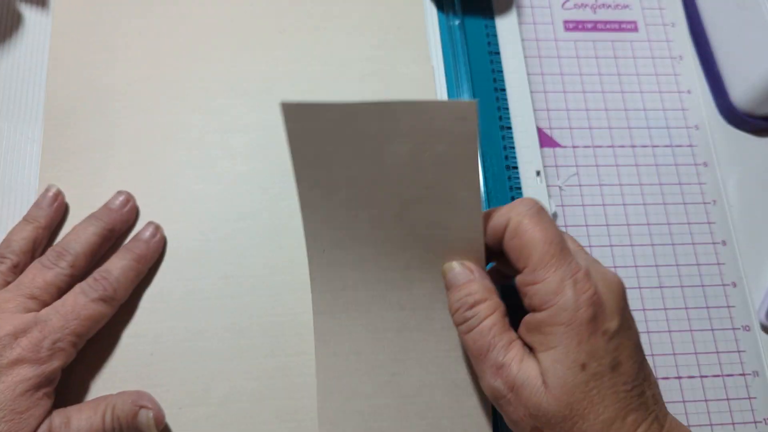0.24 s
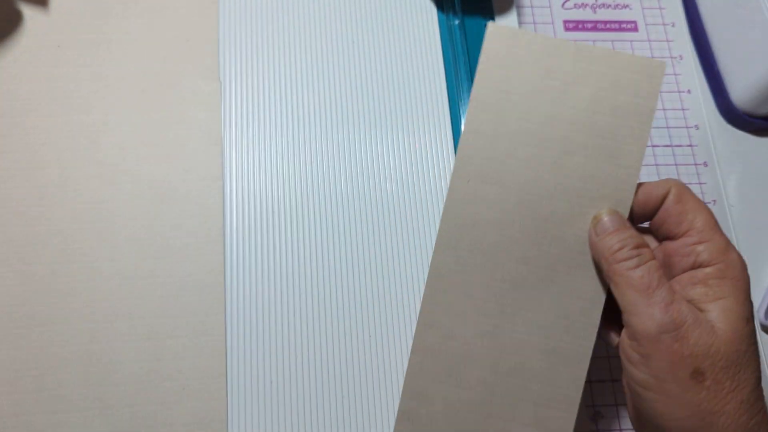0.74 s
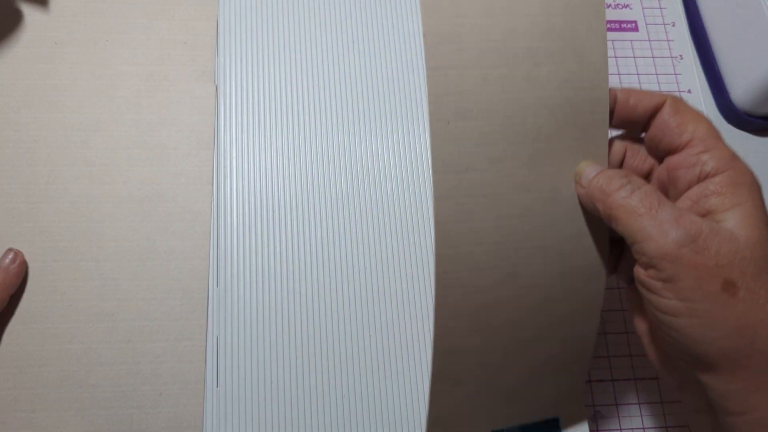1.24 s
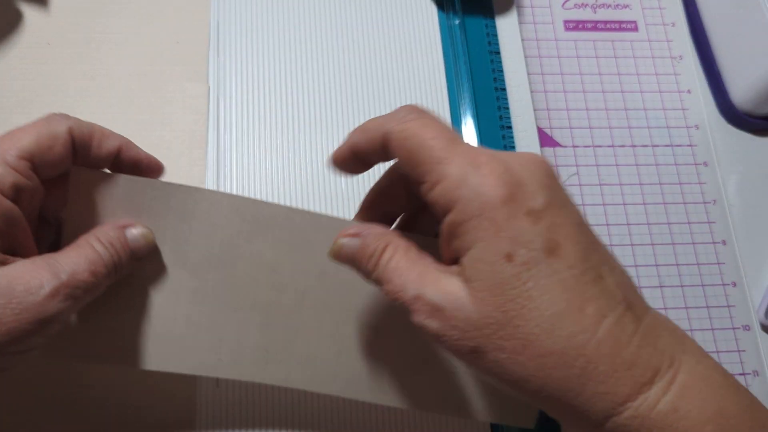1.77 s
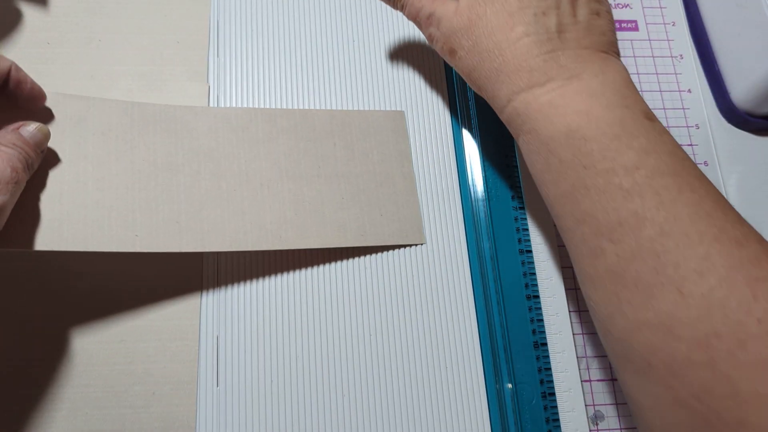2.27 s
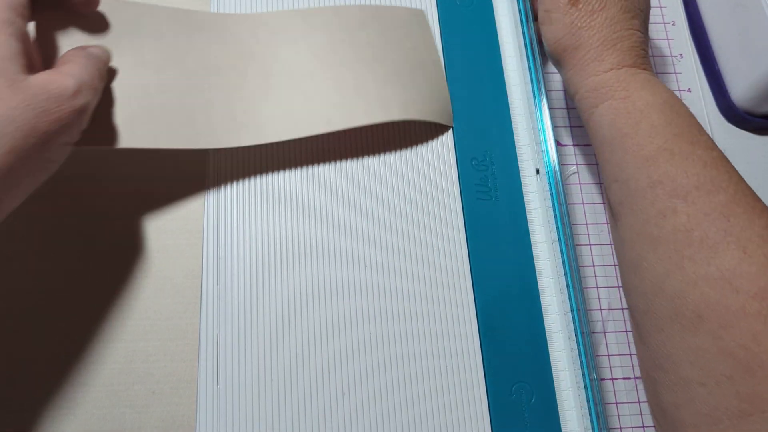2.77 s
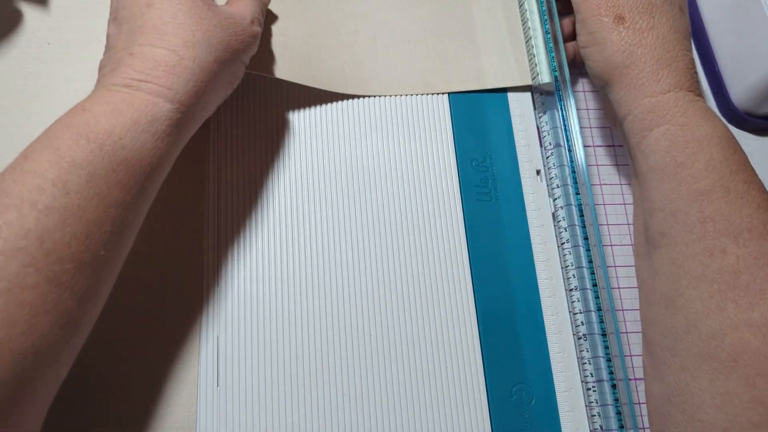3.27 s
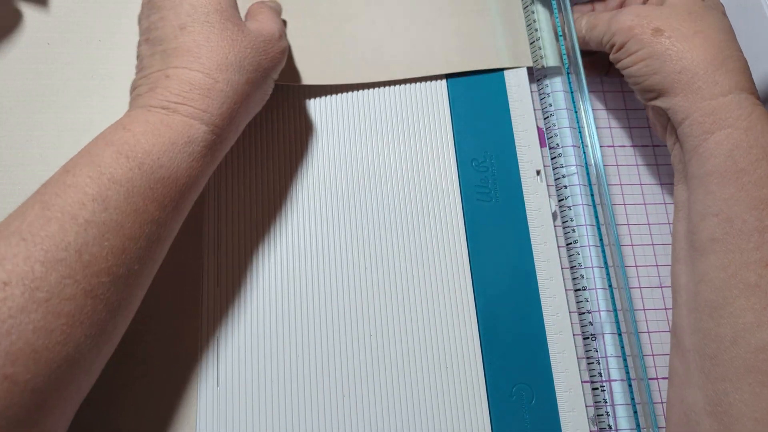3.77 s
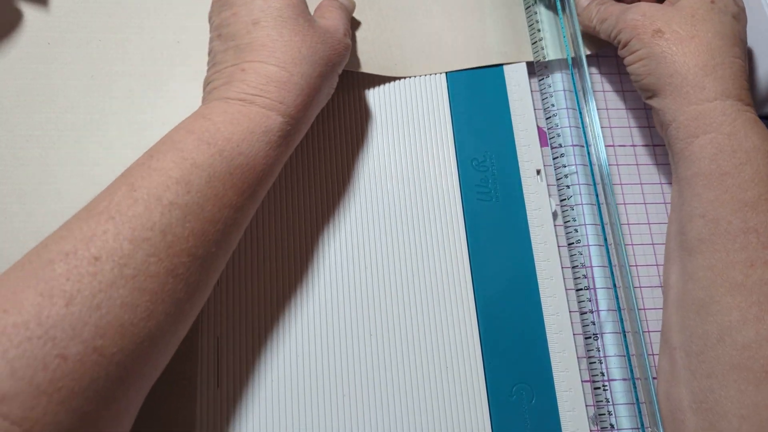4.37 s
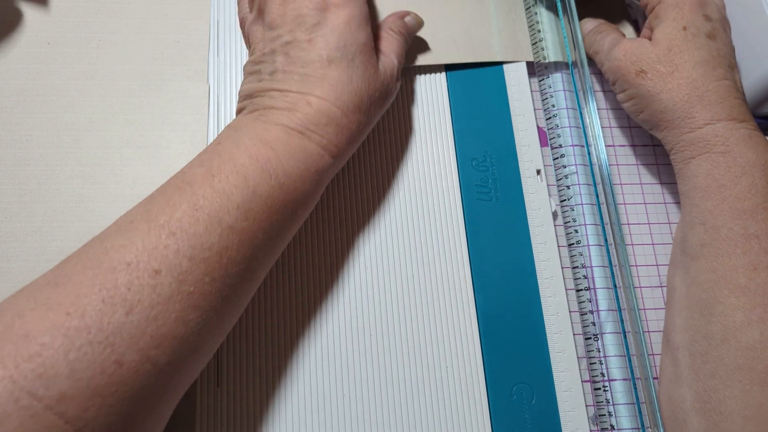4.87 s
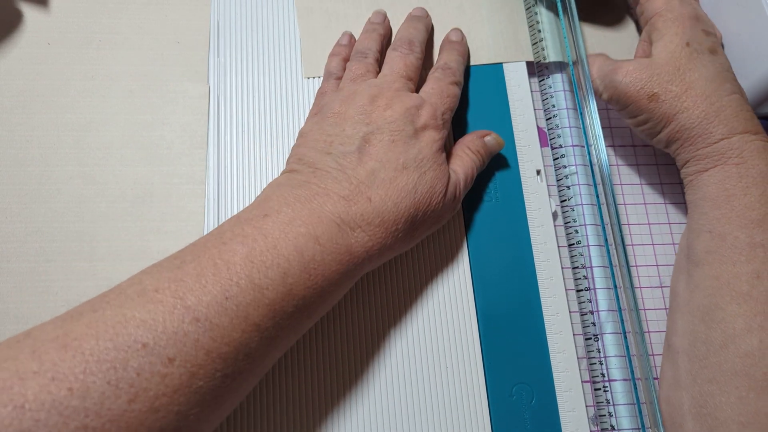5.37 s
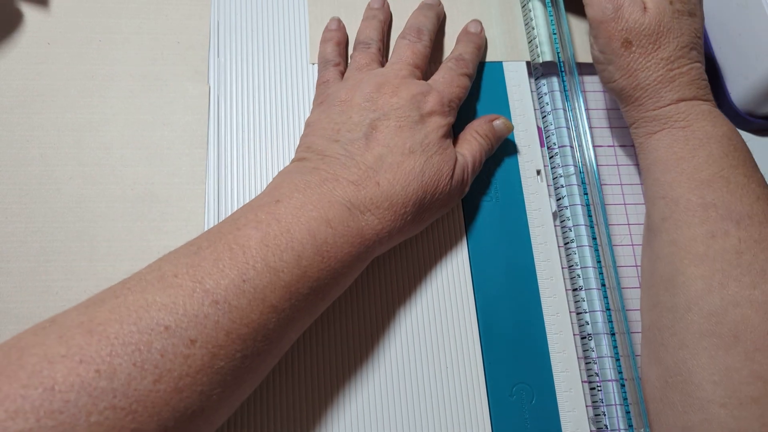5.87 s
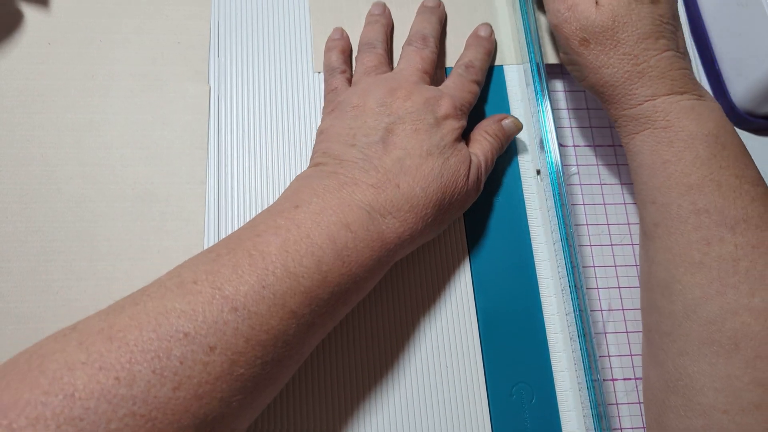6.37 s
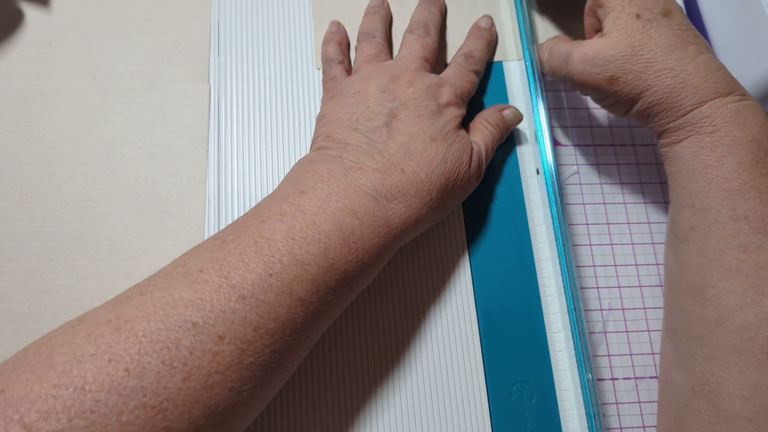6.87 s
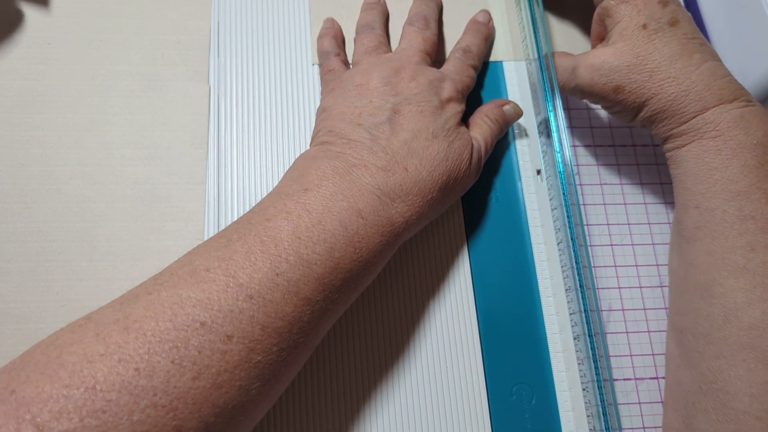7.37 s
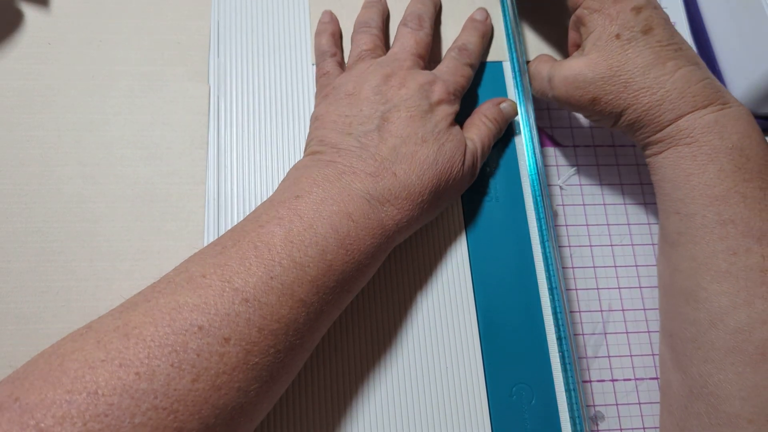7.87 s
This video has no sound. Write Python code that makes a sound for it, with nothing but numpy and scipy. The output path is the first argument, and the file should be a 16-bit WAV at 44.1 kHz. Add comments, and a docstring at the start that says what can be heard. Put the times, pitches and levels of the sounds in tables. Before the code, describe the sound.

Close in a quiet room, papery swish and flicks give way to a loud plastic clatter, hollow knocks, scraping card and faint final taps.

```python
"""Card strip on a paper trimmer

A craft table in a small quiet room, close by, heard by two microphones. A strip of card is slid over a plastic
trimmer: random fibre slips make its hiss and rustle, short ringing modes its flaps. The clear guide arm clacks
up in ringing modes with a crack, then the card scrapes and sings under it. Modes of the hollow base ring in its
knocks on the table; low noise bursts are hands landing there. Room air, a faint mains hum and microphone hiss
lie underneath."""
import sys
import numpy as np
from scipy import signal
from scipy.fft import rfft, irfft, next_fast_len
from scipy.io import wavfile

SR = 44100
rng = np.random.default_rng(int(sys.argv[2]) if len(sys.argv) > 2 else 0)


def pcm_store(signal):
    """Save signal as 16-bit PCM."""
    levels = np.round(np.clip(np.atleast_2d(signal), -1, 1) * 32767)
    wavfile.write(sys.argv[1], SR, levels.astype(np.int16).T)


N = 358522
TIME = np.arange(N) / SR   # [s]
AGE = TIME[:SR // 3]   # time since a blow [s]


def from_db(db):
    """Decibels to amplitude gain."""
    return 10 ** (np.asarray(db) / 20)


def rms_one(x):
    """Scale to rms 1."""
    return x / np.sqrt(np.mean(x ** 2) + 1e-20)


def at_hz(points, hz):
    """Read a table on a log-frequency axis."""
    known_hz, values = np.transpose(points)
    return np.interp(np.log(np.maximum(hz, 1)), np.log(known_hz), values)


def add(track, s, sound):
    """Mix a sound into a track at time s."""
    start = max(round(s * SR), 0)
    track[:, start:start + sound.shape[1]] += sound[:, :N - start]


def drift(rate):
    """Slow chance with rms 1, taking a new random value rate times a second."""
    knots = rng.standard_normal(N // 20)
    return rms_one(np.interp(TIME * rate, np.arange(len(knots)), knots))


def dying(t60):
    """Exponential decay after a blow, down 60 dB at t60 [s]."""
    return from_db(-60 * AGE / t60)


def along(curve):
    """Gain that follows a curve of (time [s], level [dB]), silent outside it."""
    s, db = np.transpose(curve)
    return from_db(np.interp(TIME, s, db)) * (TIME > s[0]) * (TIME < s[-1])


def strokes(table, edge_s, stop_s, swell_db):
    """Gain of a run of strokes: each starts quickly, swells or wanes, and coasts to a stop."""
    start, end, db = np.transpose(table)[:, :, None]
    s = TIME[::40]
    starting = np.clip((s - start) / edge_s + .5, 0, 1)
    moving = starting / (1 + (np.maximum(s - end, 0) / stop_s) ** 2)
    progress = np.clip((s - start) / np.maximum(end - start, edge_s), 0, 1)
    gain = np.linalg.norm(moving * from_db(db + swell_db * progress), axis=0)
    return np.interp(TIME, s, gain)


def with_rebound(s, db, after_s, loss_db):
    """A blow and its bounce, db changed by loss_db: (time [s], level [dB])."""
    return [(s, db), (s + after_s * rng.uniform(.8, 1.2), db + loss_db)]


def placed(x, left_db, lag_s):
    """A source off centre is louder at one microphone and reaches the left one lag_s later."""
    left, right = x * from_db([[left_db / 2], [-left_db / 2]])
    return np.array([np.roll(left, round(lag_s * SR)), right])


# How alike the two microphones hear noise: (frequency [Hz], left-right correlation [-1 to 1])
STEREO_LIKENESS = [(60, 0.77), (250, 0.98), (700, 0.64), (1500, 0.14), (3000, 0.036)]


def coloured(white, spectrum):
    """Two unrelated noises become a stereo pair with this spectrum, alike in the bass; rms 1."""
    length = white.shape[1]
    size = next_fast_len(length)
    hz = np.maximum(np.fft.rfftfreq(size, 1 / SR), 1)
    skirts = np.minimum(1, np.minimum(hz / spectrum[0][0], spectrum[-1][0] / hz)) ** 4
    mid, side = rfft(white, size) * from_db(at_hz(spectrum, hz)) * skirts
    alike = np.clip(at_hz(STEREO_LIKENESS, hz), -1, 1)
    mid, side = mid * np.sqrt(1 + alike), side * np.sqrt(1 - alike)
    return rms_one(irfft([mid + side, mid - side], size)[:, :length])


def noise(spectrum, size):
    """Smooth stereo noise, rms 1."""
    return coloured(rng.standard_normal((2, size)), spectrum)


def slips(per_s, grain_db):
    """Random clicks of uneven size, with unrelated signs in two rows; rms 1."""
    sizes = from_db(grain_db * np.minimum(rng.exponential(1, N), 3))
    happens = rng.random(N) < per_s / SR
    return rms_one(happens * sizes * rng.choice([-1, 1], (2, N)))


def friction(spectrum, per_s, grain_db, smooth, flutter_db, flutter_rate):
    """Paper fibres catch and let go: dense tiny slips of uneven size under a wavering pressure."""
    rubbing = coloured(slips(per_s, grain_db) + smooth * rng.standard_normal((2, N)), spectrum)
    return rms_one(rubbing * from_db(flutter_db * drift(flutter_rate)))


def resonance(hz, width_hz):
    """Stereo noise in a resonance whose centre moves; rms 1."""
    lowpass = signal.butter(2, width_hz / 2, fs=SR, output="sos")
    a, b = signal.sosfilt(lowpass, rng.standard_normal((2, 2, N)))
    angle = 2 * np.pi * np.cumsum(hz) / SR
    return rms_one(a * np.cos(angle) + b * np.sin(angle))


def ring(modes, upper_db, rise_s, vary_db, spread, detune):
    """One blow on a body: modes vary in strength, shift with the grip, reach the ears out of step."""
    hz, db, t60 = np.transpose(modes)[:, :, None]
    strength, turn, phase, shift = rng.standard_normal((4, len(modes), 1))
    upper = np.clip(2 * np.log2(hz / 720), 0, 1)   # a harder contact favours the upper modes
    swing = from_db(db + vary_db * strength + upper_db * upper) * dying(t60)
    # rise_s holds at 1 kHz, low modes build up later
    swing = swing * (1 - np.exp(-AGE * (hz / 1000) ** 2 / rise_s))
    angle = 2 * np.pi * hz * (1 + detune * shift) * AGE + np.pi * phase
    ears = [swing * np.sin(angle + side * spread * turn) for side in (1, -1)]
    return np.sum(ears, axis=1) / np.sqrt(np.sum(from_db(db) ** 2))


# Spectrum of a hard contact: (frequency [Hz], density [dB per Hz])
CRACK_SPECTRUM = [(1000, 9.5), (3500, 4.5), (4700, 0), (7500, -2.5), (10000, -12), (12500, -10.5),
                  (16000, -26)]


def crack(contact_s, tail_db, tail_t60):
    """The contact itself, taller the shorter it lasts; then the crowded high modes die away."""
    release = np.exp(-AGE / contact_s)
    snap = np.sqrt(release * .001 / contact_s)
    return noise(CRACK_SPECTRUM, len(AGE)) * (1 - release) * (snap + from_db(tail_db) * dying(tail_t60))


def crinkle(modes, per_s, grain_db):
    """Many tiny steps of uneven size at random, each of which rings the body; rms 1."""
    body = ring(modes, 0, rise_s=.0006, vary_db=1, spread=.4, detune=.02)
    return rms_one(signal.fftconvolve(slips(per_s, grain_db)[:1], body, axes=1)[:, :N])


# Spectra of still room air and of microphone hiss: (frequency [Hz], density [dB per Hz])
ROOM_AIR = [(45, -4), (125, -2.5), (180, -11.5), (300, -17.5), (480, -22), (730, -11.5), (860, -21),
            (1200, -14.5), (1600, -14), (4000, -19.5), (5500, -21.5)]
MIC_HISS = [(3000, -44), (4500, -5), (6500, 1), (8400, -0.5), (9400, -14), (12000, -14), (15000, -28)]
# Mains hum: (frequency [Hz], rms level [dB])
MAINS_HUM = [(120, -69.5)]


def background():
    """Still room air and microphone hiss are steady noises; a faint mains hum is a sine."""
    hum = sum(from_db(db) * np.sqrt(2) * np.sin(2 * np.pi * hz * TIME) for hz, db in MAINS_HUM)
    air = from_db(-62) * noise(ROOM_AIR, N) + from_db(-68.5) * noise(MIC_HISS, N)
    return placed(air + hum, left_db=2.0, lag_s=0)


# Levels here and below are relative, before each layer's own trim.
# The card is swept across the base, louder the faster it goes: (time [s], hiss level [dB])
CARD_SWEEP = [(0.15, -100), (0.214, -58.5), (0.426, -45.5), (0.458, -39), (0.602, -37), (0.698, -38),
              (0.766, -54.5), (0.852, -43.5), (0.91, -54), (0.926, -49), (1.028, -56.5), (1.044, -61),
              (1.22, -73.5)]
# The loose sheet is laid across the base: (time [s], rustle level [dB])
SHEET_LAYING = [(2.4, -65), (2.59, -54), (2.7, -54.5), (2.87, -44.5), (3.0, -45), (3.04, -55), (3.2, -58.5)]
# Short nudges of the card over the base: (start [s], end [s], level [dB])
CARD_NUDGES = [(1.26, 1.39, -50.5), (5.42, 5.49, -62.5), (5.6, 5.66, -61), (5.73, 5.84, -61)]
# The strip is lifted and bent in the air, also heard creaking: (start [s], end [s], level [dB])
STRIP_BENDS = [(1.2, 1.58, -68.5), (1.82, 1.905, -53), (1.97, 2.09, -50), (2.74, 2.87, -71)]
# Spectra of the card's face on the base and of the sheet: (frequency [Hz], density [dB per Hz])
FACE_HISS = [(1200, -47), (2000, -14.5), (4300, -10.5), (5300, -3.5), (5830, -11.5), (6400, 0),
             (7380, -7.5), (8120, -0.5), (9920, -9.5), (12000, -4.5), (14800, -13.5), (16000, -20)]
SHEET_RUSTLE = [(180, -5.5), (430, -8), (730, 0), (880, -5), (1250, 4), (1900, 1), (2600, -3.5),
                (3500, -8.5), (6500, -18.5)]
RUSTLE_DB, RUSTLE_FOLLOWS = -39.5, 0.29   # the sheet rustles at this level plus a share of the sweep's dB
LOOSE_HISS_DB, BEND_HISS_DB = -13.5, -5.5   # hiss that goes with the laying and with a bend
# The microphone colours the hiss with a bright band near 8 kHz; it stands out at full speed, and its centre
# sinks by a share as the card slows
SWISH_HZ, SWISH_WIDTH_HZ, SWISH_DB, SWISH_SAG = 8380, 1700, -35, .12


def sliding_card():
    """The card's face hisses on the base, the sheet rustles lower down; at speed a swish stands out."""
    sweep, laying = along(CARD_SWEEP), along(SHEET_LAYING)
    nudges = strokes(CARD_NUDGES, edge_s=0.12, stop_s=0.037, swell_db=-8.5)
    nudges = nudges * from_db(2.0 * drift(22))   # the hand pushes unevenly
    bends = strokes(STRIP_BENDS, edge_s=0.026, stop_s=0.11, swell_db=-7.0)

    hiss_gain = sweep + nudges + from_db(LOOSE_HISS_DB) * laying + from_db(BEND_HISS_DB) * bends
    hiss = hiss_gain * friction(FACE_HISS, per_s=4600, grain_db=2.0, smooth=0.49,
                                flutter_db=1.1, flutter_rate=150)

    speed = sweep / sweep.max()
    swish_hz = SWISH_HZ * (1 - SWISH_SAG * (1 - speed))
    swish = from_db(SWISH_DB) * speed ** 2.5 * resonance(swish_hz, SWISH_WIDTH_HZ)

    sweep_rustle = from_db(RUSTLE_DB) * sweep ** RUSTLE_FOLLOWS
    rustle_gain = sweep_rustle + from_db(1) * nudges + laying + from_db(-3.5) * bends
    rustle = rustle_gain * friction(SHEET_RUSTLE, per_s=430, grain_db=1.0, smooth=1.0,
                                    flutter_db=2.0, flutter_rate=58)

    face = placed(from_db(3.5) * hiss + swish, left_db=3.0, lag_s=-.00014)
    return face + from_db(2.0) * placed(rustle, left_db=0.3, lag_s=-.00005)


# Pops of the springy card, a tighter bend rings higher: (time [s], level [dB], pitch [multiple of modes])
CARD_POPS = [(0.189, -42, 1.1), (0.247, -39, 1.0), (0.334, -38.5, 1.6), (0.84, -31.5, 1.4),
             (1.281, -35.5, 1.15), (1.298, -38, 1.05), (1.761, -40.5, 1.1), (1.7832, -33.5, 1.25),
             (1.792, -30.5, .8), (1.805, -39, .85), (1.9408, -35.5, 1.1), (1.9531, -34, .85),
             (1.963, -29.5, 1.0), (2.036, -43, 1.25), (2.05, -45, 1.25), (2.07, -40, 1.15)]
# The card's edge flicks off a finger or a ridge; the row at 3.757 s is the bright crack atop the arm's clack:
# (time [s], level [dB], t60 [s])
EDGE_FLICKS = [(0.204, -44, 0.017), (1.2588, -31, 0.0058), (1.276, -34.5, 0.021), (1.96, -41, 0.056),
               (2.068, -43, 0.093), (2.485, -39.5, 0.034), (3.757, -20.5, .025)]
# Modes of the card at pitch 1: (frequency [Hz], level [dB], t60 [s])
CARD_BODY = [(614, -2.5, 0.067), (930, 10, 0.021), (1221, 7.5, 0.061), (1565, 0.5, 0.079), (1744, 1, 0.022),
             (2190, -5.5, 0.061)]
# Spectrum of the card's edge, flicking or fed under the arm: (frequency [Hz], density [dB per Hz])
EDGE_SPECTRUM = [(3000, 2), (5000, 1.5), (6500, 5), (8000, 3), (10000, 0), (11700, 2), (16000, -10)]


def card_flaps():
    """The bent card springs back in soft, papery pops; its edge alone gives a dry flick."""
    out = np.zeros((2, N))
    for s, db, pitch in CARD_POPS:
        modes = [(hz * pitch, level, t60) for hz, level, t60 in CARD_BODY]
        body = ring(modes, 0, rise_s=0.0003, vary_db=0.0, spread=0.4, detune=0.06)
        snap = crack(contact_s=0.0019, tail_db=-13, tail_t60=0.18)
        add(out, s, from_db(db + 1.0) * body + from_db(db - 7) * snap)
    for s, db, t60 in EDGE_FLICKS:
        add(out, s, from_db(db) * noise(EDGE_SPECTRUM, len(AGE)) * dying(t60))
    return placed(out, left_db=1.0, lag_s=-.00003)


# Hands land on the table: (time [s], thud level [dB], low push over thud [dB]); the push is the hand's weight,
# or early on air swung by the card
HAND_LANDINGS = [(0.222, -65, 18), (0.355, -61.5, 13), (0.841, -46, -10), (1.278, -49.5, 7.5),
                 (1.472, -48, -23), (1.787, -50.5, -14), (2.444, -61, 12.5), (2.55, -56.5, 15),
                 (2.59, -53, -2), (3.503, -43, -3.5), (3.76, -57, 12.5), (5.686, -43.5, -10.5),
                 (6.029, -57, -0.5), (6.574, -53.5, 2.5), (7.176, -58, 4), (7.305, -60.5, -1),
                 (7.577, -55.5, 5)]
# Spectra of the table top and of the low push: (frequency [Hz], density [dB per Hz])
TABLE_THUD = [(60, -17), (110, -6), (180, -11.5), (280, -2.5), (420, -6.5), (700, -13.5), (1500, -18.5)]
LOW_PUSH = [(30, -4), (54, 1.5), (95, 5), (140, -4), (250, -11.5), (600, -41)]


def hand_bumps():
    """Soft hands land on the table: its top thuds, and a slow, low push follows."""
    out = np.zeros((2, N))
    for s, db, weight_db in HAND_LANDINGS:
        thud = noise(TABLE_THUD, len(AGE)) * (dying(0.25) - dying(0.0022))
        push = noise(LOW_PUSH, len(AGE)) * (dying(0.46) - dying(0.027))
        add(out, s, from_db(db) * (thud + from_db(weight_db) * push))
    return placed(out, left_db=-0.5, lag_s=.00009)


# The base knocks on the table: (time [s], level [dB], hardness as boost of upper modes [dB])
TABLE_KNOCKS = [(0.347, -47, 7.5), (0.722, -36.5, 5.5), (0.841, -40, 3.5), (2.473, -38.5, -5),
                (2.547, -42, 4), (2.592, -42, -2), (2.833, -33.5, 1.5), (3.488, -20.5, 1.5),
                (3.688, -28, 0.5), (3.9757, -20.5, 5), (4.111, -42.5, -11), (4.136, -40.5, -9),
                (4.465, -52.5, -11), (4.568, -46, 6), (4.921, -39.5, 7), (4.975, -48.5, 9),
                (5.262, -53, 6.5), (5.355, -47.5, 3), (5.57, -44.5, 3), (5.598, -48.5, 1),
                (5.689, -41.5, -2), (5.709, -40, 2.5), (5.759, -43.5, 4.5), (5.803, -43.5, 2.5),
                (5.921, -53.5, 2.5), (6.414, -51, -11.5), (6.57, -51.5, 2), (7.168, -46, 6.5),
                (7.571, -52, 2), (7.841, -52.5, 1), (7.917, -45, 3.5), (8.082, -48, -2)]
# Modes of the free base: (frequency [Hz], level [dB], t60 [s], change while a hand lies flat on it [dB])
BASE_BODY = [(210, -24, 0.1, 3), (243.6, -29, 0.22, 14), (345.3, -20, 0.075, 19.5),
             (539.6, -5.5, 0.099, -4.5), (599, -3, 0.095, -1), (672, -13, 0.14, 11), (742, -4, 0.086, 8),
             (1010, -4.5, 0.048, -17), (1084, 2, 0.025, -1), (1208, -1, 0.049, -1.5),
             (1484, -8.5, 0.056, 2.5), (1582, -18.5, 0.051, 6.5), (3194, -13, 0.086, -2)]
HAND_DOWN_S, HAND_DAMPING = 5.2, 0.73   # after this time a hand shortens the knocks' ring to this share
# Crack and thud against the knock's level; harder knocks crack more [dB per dB of hardness]
KNOCK_CRACK_DB, CRACK_PER_HARDNESS, KNOCK_THUD_DB = -7, 2.45, -12


def base_knocks():
    """The hollow base hits the table: it rings, the contact cracks and the table top thuds."""
    out = np.zeros((2, N))
    for start, knock_db, upper_db in TABLE_KNOCKS:
        held = start > HAND_DOWN_S
        modes = [(hz, level + hand_db * held, t60 * HAND_DAMPING ** held)
                 for hz, level, t60, hand_db in BASE_BODY]
        chatter = from_db(1.63 * drift(290)[:len(AGE)])   # loose parts chatter while the base rings
        crack_db = KNOCK_CRACK_DB + CRACK_PER_HARDNESS * upper_db
        # the base bounces once after every knock
        for s, db in with_rebound(start, knock_db, after_s=.007, loss_db=-4):
            body = ring(modes, upper_db, rise_s=0.0012, vary_db=-0.04, spread=0.33, detune=0.0087) * chatter
            snap = crack(contact_s=0.0016, tail_db=-13.0, tail_t60=0.12)
            thud = noise(TABLE_THUD, len(AGE)) * (dying(0.21) - dying(0.033))
            blow = from_db(6.0) * body + from_db(crack_db) * snap + from_db(KNOCK_THUD_DB) * thud
            add(out, s, from_db(db) * blow)
    return placed(out, left_db=0.0, lag_s=0.00019)


# Skin drags over the table in short slips: (start [s], end [s], level [dB], mean judder rate [Hz])
SKIN_DRAGS = [(0.455, 0.462, -43, 293), (0.502, 0.525, -49, 185.7), (0.547, 0.629, -50.5, 135.8),
              (1.077, 1.27, -55.5, 126.6)]


def dragging_hand():
    """Skin sticks and slips on the table: short runs of soft, uneven low judder."""
    out = 0
    for start, end, db, hz in SKIN_DRAGS:
        cycles = np.cumsum(hz * (1 + 0.21 * drift(130))) / SR
        gain = strokes([(start, end, db)], edge_s=.008, stop_s=0.0094, swell_db=1.5)
        out = out + gain * np.sin(2 * np.pi * cycles)
    return out * from_db(2 * drift(58.5))


# A corner of the card stutters over the ridges of the base: (start [s], end [s], level [dB])
CORNER_SCUFFS = [(0.645, 0.69, -50), (0.75, 0.79, -49)]


def rattling_base():
    """The base's modes tick and rattle as a corner scuffs its ridges and as the card is fed in."""
    scuffs = strokes(CORNER_SCUFFS, edge_s=0.015, stop_s=0.008, swell_db=-6)
    pushing = from_db(-9) * along(CARD_FEED) + scuffs
    return pushing * crinkle([mode[:-1] for mode in BASE_BODY], per_s=150, grain_db=7.5)


# The bent strip creaks in these resonances: (frequency [Hz], density [dB per Hz])
STRIP_CREAK = [(900, -12), (1550, 2), (2100, -3.5), (2700, -14.5), (3400, -6.5), (4200, -19)]


def flexing_card():
    """The bent strip buckles in many tiny steps, which crackle louder as the bend tightens."""
    steps = friction(STRIP_CREAK, per_s=420, grain_db=-0.5, smooth=0.62, flutter_db=5, flutter_rate=56)
    return from_db(-2.5) * steps * strokes(STRIP_BENDS, edge_s=0.023, stop_s=0.017, swell_db=5.5)


# Clacks of the guide arm: (time [s], level [dB], contact time [s])
GUIDE_CLACKS = [(2.874, -17, 0.00026), (2.8843, -9, 0.00035), (2.8984, -9, 0.00062), (2.903, -10.5, 0.0018),
                (2.9226, -17, 0.0038), (2.935, -12.5, 0.0035), (2.946, -27, .003), (2.982, -28, 0.0022),
                (2.993, -27, .0015), (3.7576, -15, 0.00043), (3.762, -19.5, 0.00086), (3.766, -17, .0016),
                (4.386, -27, 0.00027), (4.565, -30.5, 0.0003), (4.8268, -31, 0.00039),
                (4.917, -24, 0.00062), (7.055, -38, 0.0012), (7.131, -38.5, .002), (7.142, -41, .002)]
# Modes of the arm for a contact of one millisecond: (frequency [Hz], level [dB], t60 [s])
ARM_BODY = [(1070, -6, 0.083), (1280, -2, 0.058), (1522, 2, 0.074), (1720, 3, 0.058), (2114, 0, 0.041),
            (2230, -5, 0.055), (2595, -6.5, 0.065), (3340, -11, 0.04), (4260, -10, 0.029)]
THINNING_CYCLES = 0.53   # a contact barely moves modes that swing less than this while it lasts
SOFTENING_DB_PER_OCTAVE = -3   # tilt of the arm's modes for each tenfold lengthening of the contact
CLACK_CRACK_DB = -11.5   # against the clack's level, for a contact of one millisecond


def arm_clacks():
    """The stiff arm snaps in its hinge and rattles on the base; brief contacts crack, long ones ring."""
    out = np.zeros((2, N))
    for start, clack_db, contact_s in GUIDE_CLACKS:
        thinning_hz = np.clip(THINNING_CYCLES / contact_s, 200, 4000)
        thinning = signal.butter(2, thinning_hz, "high", fs=SR, output="sos")
        tilt_db = SOFTENING_DB_PER_OCTAVE * np.log10(contact_s / .001)
        modes = [(hz, level + tilt_db * np.log2(hz / 1500), t60) for hz, level, t60 in ARM_BODY]
        sharpness = .001 / contact_s
        for s, db in with_rebound(start, clack_db, after_s=.004, loss_db=-10):
            body = ring(modes, 0, rise_s=contact_s, vary_db=6, spread=0.26, detune=0.0373)
            body = body * (1 + 2.65 * dying(0.0054))   # the first swing is the strongest
            snap = crack(contact_s, tail_db=-9.0, tail_t60=0.029)
            clack = from_db(db - 10.5) * body + from_db(db + CLACK_CRACK_DB) * sharpness * snap
            add(out, s, signal.sosfilt(thinning, clack))
    return placed(out, left_db=-1.0, lag_s=.00009)


# The card is fed under the guide arm, which also rattles the base: (time [s], scrape level [dB])
CARD_FEED = [(3.2, -75), (3.58, -53), (3.66, -62), (3.81, -52.5), (3.95, -60), (4.09, -49.5), (4.27, -62.5),
             (4.42, -52), (4.8, -69.5)]
# Its edge catches and is shoved on: (start [s], end [s], level [dB])
EDGE_SHOVES = [(3.21, 3.345, -51.5), (3.26, 3.29, -50), (3.39, 3.41, -48), (3.74, 3.765, -35.5),
               (3.84, 3.87, -46.5), (4.825, 4.915, -50.5), (6.43, 6.51, -57.5), (7.06, 7.17, -62.5)]
# The card's edge sings against the rail: (time [s], resonance level [dB])
RAIL_SONG = [(3.15, -65), (3.66, -65), (3.88, -58.5), (4.45, -57.5), (4.95, -66)]
# Spectrum of the scrape under the arm: (frequency [Hz], density [dB per Hz])
ARM_SCRAPE = [(300, -8), (700, -3.5), (900, -11.5), (1300, -3), (2400, -1.5), (3300, -9), (6000, -10.5)]
FEED_HISS_DB, DULLING_DB_PER_S = -7, 2   # hiss against the feed curve; it fades as the card goes deeper
RAIL_HZ, RAIL_WIDTH_HZ, RAIL_WANDER = 2250, 620, .09   # the centre wanders by this rms share


def fed_card():
    """The edge catches and slips under the arm with hiss and scrape; as it bends its rail song wanders."""
    feed = along(CARD_FEED)
    shoves = strokes(EDGE_SHOVES, edge_s=0.048, stop_s=0.015, swell_db=-4.0)
    first_s, last_s = CARD_FEED[0][0], CARD_FEED[-1][0]
    dulling = from_db(-DULLING_DB_PER_S * np.clip(TIME - first_s, 0, last_s - first_s))

    hiss_gain = dulling * np.hypot(from_db(FEED_HISS_DB) * feed, shoves)
    hiss = hiss_gain * friction(EDGE_SPECTRUM, per_s=8800, grain_db=6, smooth=0.7,
                                flutter_db=3.5, flutter_rate=70)
    scrape = np.hypot(feed, shoves) * friction(ARM_SCRAPE, per_s=310, grain_db=1, smooth=1.0,
                                               flutter_db=2.5, flutter_rate=90)

    rail_hz = RAIL_HZ * (1 + RAIL_WANDER * drift(14))
    rail_gain = along(RAIL_SONG) + shoves   # a shove makes it squeak
    rail = rail_gain * resonance(rail_hz, RAIL_WIDTH_HZ)
    return placed(from_db(3.5) * hiss + from_db(2.0) * scrape + rail, left_db=0, lag_s=.00006)


# Decay of the small room: (frequency [Hz], t60 [s])
ROOM_DECAY = [(150, 0.33), (2500, 0.24), (8000, 0.061), (15000, 0.031)]


def room(x, wet_db):
    """Dense reflections from nearby walls, the treble dying first."""
    size = next_fast_len(N + len(AGE))
    edges = np.geomspace(80, 16000, 8)   # band edges [Hz]
    tail = 0
    for low, high in zip(edges, edges[1:]):
        bandpass = signal.butter(2, [low, high], "band", fs=SR, output="sos")
        band = signal.sosfilt(bandpass, rng.standard_normal((2, len(AGE))))
        tail = tail + band * dying(at_hz(ROOM_DECAY, np.sqrt(low * high)))
    tail = rms_one(tail * (1 - dying(0.008))) / np.sqrt(len(AGE))
    reflections = irfft(rfft(x, size) * rfft(tail, size), size)[:, :N]
    return x + from_db(wet_db) * reflections


def scene():
    """Everything on the table, heard in the room."""
    card = sliding_card() + card_flaps() + flexing_card() + fed_card()
    table = card + hand_bumps() + base_knocks() + dragging_hand() + rattling_base() + arm_clacks()
    return room(table, wet_db=-18) + background()


def record(dry):
    """The microphone drops the deepest bass; the top is cut steeply."""
    thinned = signal.sosfilt(signal.butter(6, 42, "high", fs=SR, output="sos"), dry)
    return signal.sosfilt(signal.ellip(10, .1, 80, 15900, fs=SR, output="sos"), thinned)


dry = scene()
out = record(dry)
pcm_store(out)
```